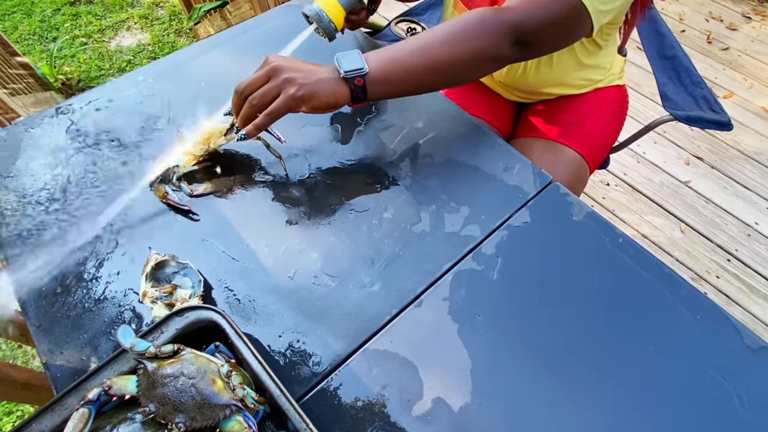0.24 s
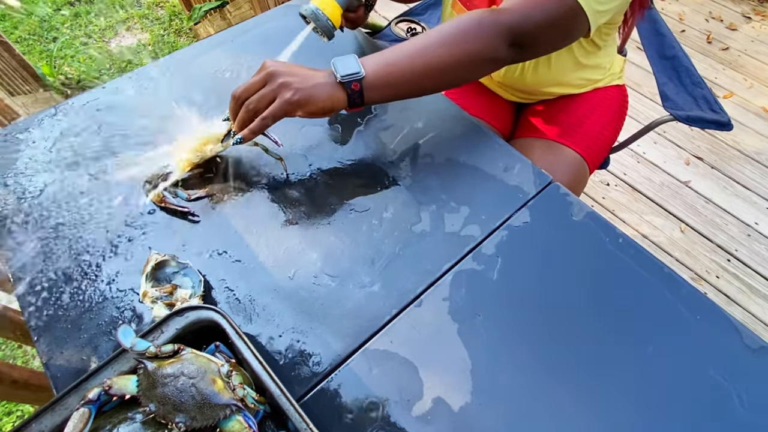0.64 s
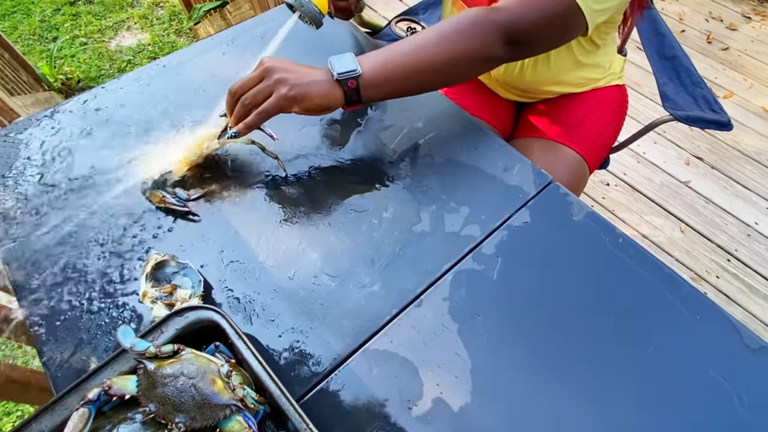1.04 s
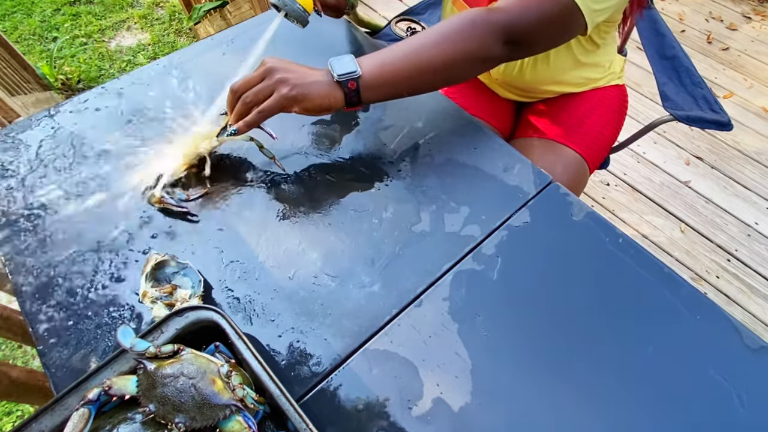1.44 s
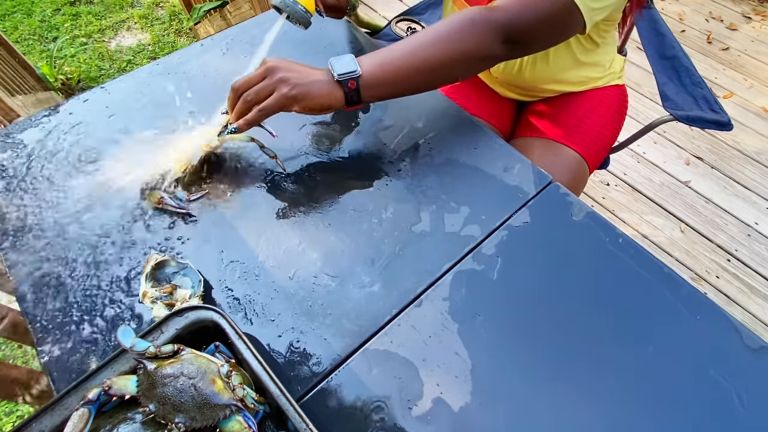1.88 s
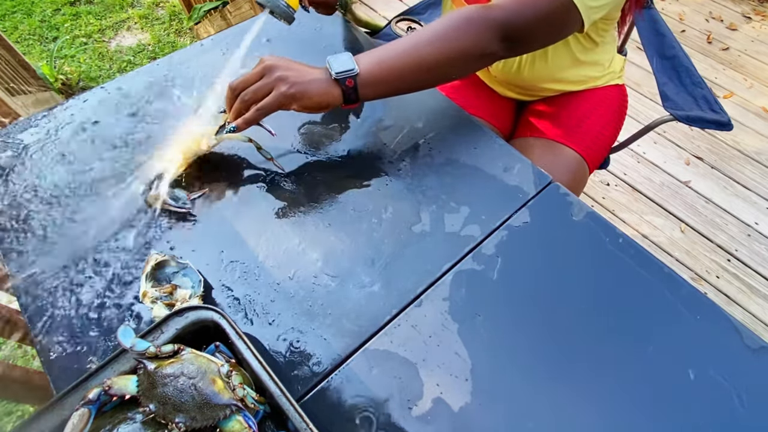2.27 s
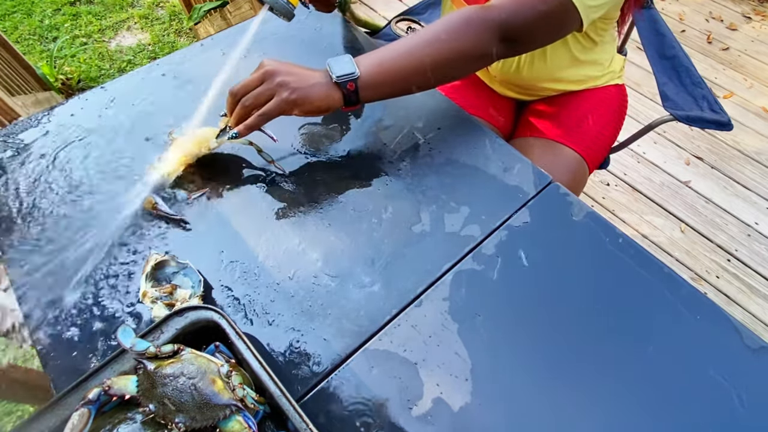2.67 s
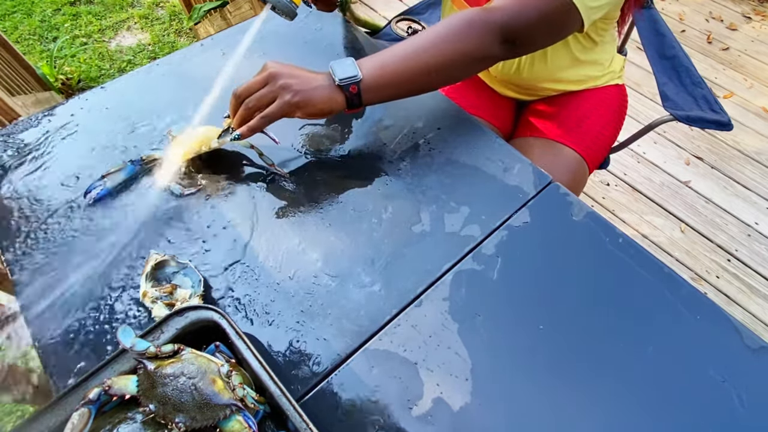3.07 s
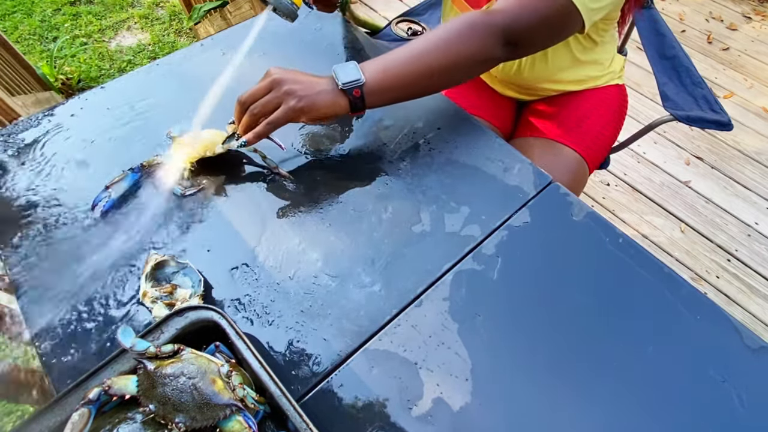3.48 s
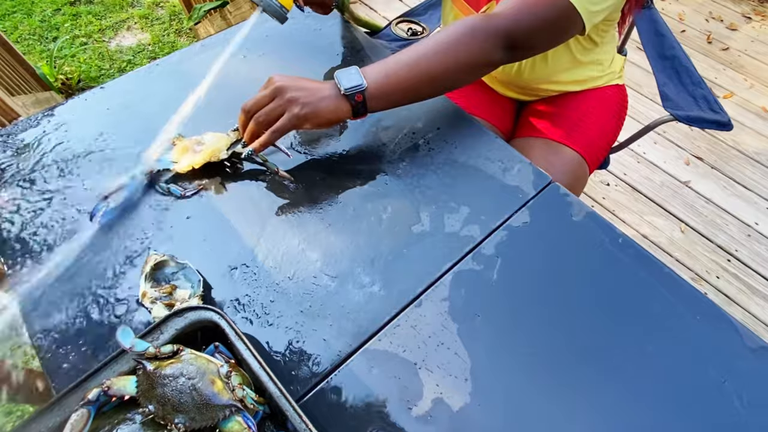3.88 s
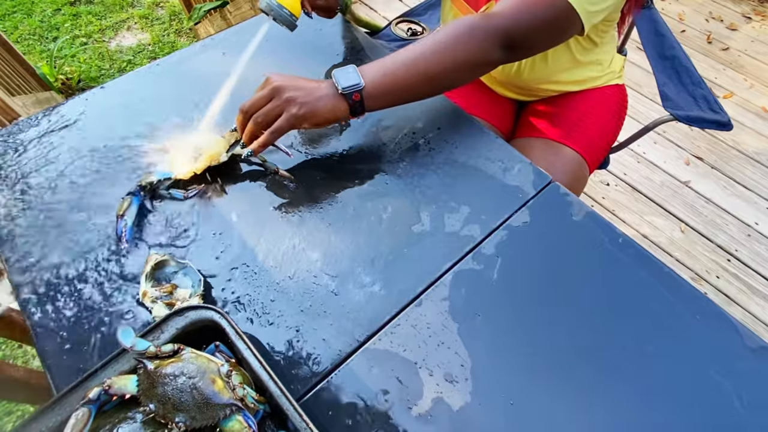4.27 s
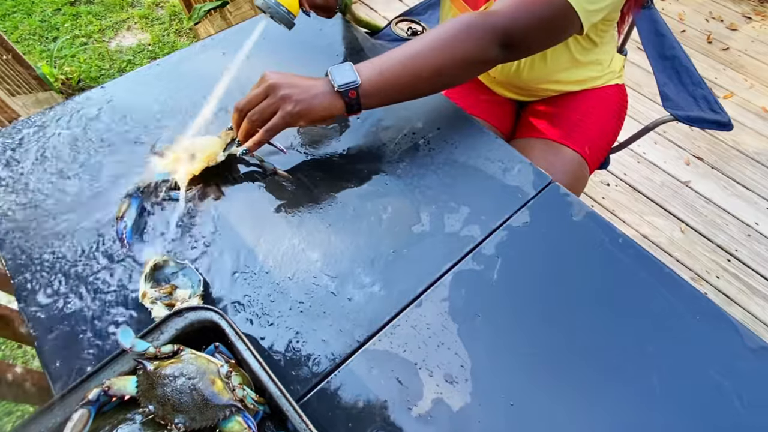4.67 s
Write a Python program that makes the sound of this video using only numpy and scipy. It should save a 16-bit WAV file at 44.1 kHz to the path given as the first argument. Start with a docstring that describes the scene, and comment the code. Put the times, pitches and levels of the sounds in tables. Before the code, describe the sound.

A steady, hissing water jet spatters over a crab shell and plastic table outdoors, with uneven low drumming that grows stronger past the middle.

```python
"""Hose jet on a shell over a plastic table

A hose jet sprays a shell held on a plastic table outdoors, near a pair of spaced microphone ports.
The jet breaks up into spatter, coloured noise under drop envelopes: splash from the left, fine fizz
from the right. Where the water strikes, noise-driven resonances drum as the table's low modes.
The pool gurgles in short rising tones; a low outdoor rumble of filtered noise lies below."""
import sys
import numpy as np
from scipy import signal
from scipy.fft import rfft, irfft, next_fast_len
from scipy.io import wavfile
from scipy.ndimage import uniform_filter1d

SR = 44100
rng = np.random.default_rng(int(sys.argv[2]) if len(sys.argv) > 2 else 0)


def store_wav(level_fs):
    """Save 16-bit WAV to argv[1]."""
    pcm = np.round(np.clip(np.atleast_2d(level_fs), -1, 1) * 32767)
    wavfile.write(sys.argv[1], SR, pcm.T.astype(np.int16))


def nominal_scale(level):
    """Amplitude ratio for a level in decibels (scalar or array-like)."""
    x = np.asarray(level, float) / 20
    return 10 ** x


N = 212906  # samples
PORTS_S = .000263  # sound travel time between the ports

# how hard the jet drums the table: start_s, then level_db of mode groups 1 (lowest) to 5 (upper)
DRUMMING = [(0.0, -48, -33, -58, -48, -41.5), (0.04, -43, -36.5, -56, -58, -52),
            (0.08, -41, -46, -38, -34, -47), (0.16, -34, -41, -40.5, -38.5, -48),
            (0.2, -44, -35.5, -39, -53, -44.5), (0.25, -36, -39.5, -38.5, -39, -46.5),
            (0.32, -54, -40, -55, -51.5, -52.5), (0.42, -52, -43, -46.5, -50, -48.5),
            (0.79, -53, -77, -60, -58.5, -63), (0.85, -48, -44, -48.5, -44, -44),
            (0.89, -39.5, -46, -52, -55, -51.5), (1.1, -70, -63, -48.5, -50.5, -66),
            (1.18, -45, -61, -61, -54, -52), (1.22, -54, -67, -65, -48, -47.5),
            (1.28, -63, -71, -48.5, -52.5, -63), (1.67, -40.5, -41.5, -46.5, -53.5, -51),
            (1.81, -86, -82, -71, -63, -85), (2.03, -53, -64, -53, -58, -68),
            (2.24, -49.5, -57, -56, -58, -59), (2.42, -33, -38, -41, -43, -40),
            (2.49, -41.5, -46.5, -42.5, -65, -50.5), (2.77, -33.5, -36.5, -48, -44, -45),
            (2.78, -31, -36, -48, -44, -48.5), (2.9, -34, -27, -35, -40, -39),
            (2.96, -36, -31, -40, -37, -35.5), (3.02, -32, -29, -45, -47, -38),
            (3.06, -47, -31, -36, -38, -38.5), (3.1, -43, -29.5, -46, -42, -44),
            (3.14, -40, -23, -37, -42, -35.5), (3.17, -20.5, -36, -50, -38, -34.5),
            (3.2, -33, -33.5, -39, -39, -40), (3.51, -41, -35, -44.5, -39, -39.5),
            (3.55, -36, -27.5, -48, -32.5, -43), (3.57, -26.5, -34, -35, -38, -36),
            (3.68, -40, -36, -44, -50, -48.5), (3.75, -34.5, -44, -39, -41, -44),
            (3.88, -32, -24, -38, -41, -40.5), (3.91, -37, -49, -39, -44, -43),
            (4.0, -44, -42, -52, -45, -42.5), (4.07, -55, -33, -41, -44.5, -43),
            (4.22, -35.5, -47, -38.5, -43, -46.5), (4.48, -43, -69, -45.5, -54, -52),
            (4.56, -36.5, -42, -41.5, -44, -48), (4.65, -41, -60, -53, -48, -53),
            (4.69, -44.5, -53, -37, -43.5, -47.5), (4.83, -42, -58, -57, -49, -51)]


def evened(x):
    """Scales to rms 1."""
    return x / np.sqrt(np.mean(x ** 2) + 1e-20)


def read(points, hz):
    """Interpolates a spectrum table on a log frequency axis."""
    point_hz, value = np.transpose(points)
    return np.interp(np.log(hz + 1), np.log(point_hz + 1), value)


def curve(rows, column):
    """One control curve at every sample."""
    rows = np.array(rows)
    return np.interp(np.arange(N) / SR, rows[:, 0], rows[:, column])


def wander(hz):
    """Slow random curve of rms 1: noise above 3 Hz, low-passed at hz."""
    size = next_fast_len(N)
    f = np.fft.rfftfreq(size, 1 / SR)
    spectrum = rfft(rng.standard_normal(size)) * (f > 3) / (1 + (f / hz) ** 2)
    return evened(irfft(spectrum, size)[:N])


def in_band(colour, lo_hz, hi_hz):
    """Level in dB that white noise of this colour has between two frequencies."""
    hz = np.linspace(0, SR / 2, num=512)
    inside = (hz > lo_hz) * (hz < hi_hz)
    return 10 * np.log10(np.mean(nominal_scale(2 * read(colour, hz)) * inside))


def bump(hz, centre_hz, octaves):
    """A flat-topped window on the frequency axis."""
    return np.exp(-(np.log2((hz + 1) / centre_hz) / octaves) ** 4)


def partly_alike(a, b, same):
    """Two signals for the ports, the second correlated with the first by the likeness same."""
    return np.array([a, same * a + np.sqrt(1 - same ** 2) * b])


def spatter(per_s, spread_db, decay_s):
    """Power of random drops, mean 1: sudden starts, short decays, a few large."""
    lands = rng.random(N) < per_s / SR
    size = nominal_scale(spread_db * np.minimum(rng.exponential(1, N), 4.2)) * lands
    power = signal.lfilter([1], [1, -np.exp(-1 / (decay_s * SR))], size ** 2)
    return power / power.mean()


def bursts():
    """Power of the largest bursts of spatter, under a millisecond each, in splash and in fizz."""
    # largest bursts: peak_s, peak_db over the spray, low_share (1 all splash, 0 all fizz)
    burst_rows = [(.0844, 14, .9), (.1012, 14, .6), (.7818, 13, .9), (.8277, 12, .1), (1.9806, 12, 0),
                  (2.0634, 13, 0), (2.6196, 12, .9), (2.6461, 13, .95), (3.1879, 13, 0), (4.4415, 13, .95),
                  (1.7252, 13, 0), (1.7703, 13, 0), (2.4268, 13, .1), (2.5814, 14, 0), (2.8202, 12, 0),
                  (2.8991, 14, .45), (3.0522, 15, .9), (3.2629, 16, .9), (3.3204, 14, .6),
                  (3.4215, 15.5, .9), (3.4705, 12, .2), (3.5674, 14, 0), (3.5798, 15, .9), (3.6415, 12, .6),
                  (3.741, 13, .7), (3.972, 14, .9), (3.8373, 18.5, .15), (3.9857, 14, .9), (4.0051, 14, .9),
                  (4.0424, 18, .05), (4.4163, 15, .1)]
    sigma_s = .0003
    t = np.arange(N) / SR
    total = np.zeros((2, N))
    for peak_s, peak_db, low_share in burst_rows:
        pulse = nominal_scale(2 * peak_db) * np.exp(-.5 * ((t - peak_s) / sigma_s) ** 2)
        total += np.outer([low_share, 1 - low_share], pulse)
    return total


def heard(power, colour, shifts, pan, same, lag_s, patchy_db, tint_db, leads=(), width=np.ones(N)):
    """Noise under a power envelope reaches both ports: partly alike, the right one lag_s later."""
    # extra phase between the ports by frequency: freq_hz, extra_lead_rad of the left
    extra_phase = [(200, 0), (650, 1.1), (1300, .5), (1450, .82), (1600, -.1), (1750, .25), (1900, 0),
                   (2200, -.4), (2400, -.2), (2700, .4), (3500, 0), (5000, -.9), (6500, 1), (6900, 0),
                   (7400, -3.2), (8000, -1.6), (8500, 0), (9000, -.5), (9400, -.4), (10000, -.9),
                   (11000, -.6), (12000, 0)]
    noise = np.sqrt(power) * rng.standard_normal((2, N))
    hz, t, z = signal.stft(noise, SR, nperseg=512, noverlap=448)
    at = np.minimum(t * SR, N - 1).astype(int)

    patch, tint = rng.standard_normal((2,) + z.shape[1:])
    patch = uniform_filter1d(uniform_filter1d(patch, size=9, axis=0), size=50, axis=1)  # drifting colour
    tint = uniform_filter1d(uniform_filter1d(tint, size=24, axis=0), size=4, axis=1)  # brief, broad tints
    moved_db = sum(np.outer(bump(hz, f, octaves), db[at]) for f, octaves, db in shifts)
    level_db = read(colour, hz)[:, None] + moved_db + patchy_db * evened(patch) + tint_db * evened(tint)

    likeness = np.clip(read(same, hz), 0, 1)[:, None] ** np.maximum(width[at], 0)
    aim_rad = sum(np.outer(bump(hz, f, octaves), lead[at]) for f, octaves, lead in leads)
    lead_rad = 2 * np.pi * np.outer(hz, lag_s[at]) + read(extra_phase, hz)[:, None] + aim_rad
    half_pan = nominal_scale(read(pan, hz) / 2)[:, None]
    left, right = partly_alike(z[0], z[1], likeness)
    z = np.array([left * half_pan, right * np.exp(-1j * lead_rad) / half_pan]) * nominal_scale(level_db)
    return signal.istft(z, SR, nperseg=512, noverlap=448)[1][:, :N]


def spray():
    """Splash and fizz share the drops and the flutter of the unsteady jet."""
    # jet strength: start_s, splash_db (2.5-6 kHz), fizz_db (9-12.5 kHz),
    # lower_db (lower half of the splash against its whole), spray_db (6-8.8 kHz)
    jet = [(0.0, -37, -41, -8.5, -38.5), (0.09, -46.5, -40.5, -8.5, -35.5), (0.13, -33.5, -32.5, -8.5, -35),
           (0.19, -44, -39.5, -5, -43.5), (0.28, -38.5, -34.5, -6, -38), (0.38, -40.5, -37.5, -4, -41.5),
           (0.58, -36.5, -34.5, -6.5, -37.5), (0.86, -42, -37, -3, -41.5), (1.1, -41.5, -37.5, -6, -42.5),
           (1.48, -38, -35, -4, -38), (1.61, -41, -38.5, -4, -42), (1.88, -40, -35.5, -5.5, -40),
           (2.19, -38.5, -35, -3, -38), (2.36, -41, -37.5, -4.5, -42), (2.47, -38, -34.5, -4.5, -40.5),
           (2.53, -40, -37.5, -4, -41), (2.65, -35, -35, -8, -40), (2.69, -40.5, -37, -7, -42.5),
           (2.88, -38, -32.5, -6, -40), (2.9, -34, -37, -7, -30.5), (2.92, -38.5, -35.5, -5, -37),
           (3.13, -41.5, -37, -7, -41), (3.27, -41.5, -34, -7.5, -36), (3.28, -41, -37, -10, -42.5),
           (3.4, -38, -36, -6, -37.5), (3.43, -33, -33.5, -8.5, -38), (3.44, -43, -37, -4.5, -40),
           (3.52, -40, -35, -4, -39.5), (3.57, -37, -35, -5, -33.5), (3.67, -37.5, -34.5, -6, -39),
           (3.7, -45, -40, 1, -42), (3.72, -36.5, -33, -8, -34), (3.82, -41, -37.5, -3.5, -40),
           (3.87, -36, -33.5, -4.5, -34.5), (3.95, -45.5, -35, 0, -40.5), (4.0, -35, -37, -9, -39),
           (4.03, -43, -39.5, -5, -46), (4.05, -40.5, -33.5, -6, -42), (4.06, -40, -37, -4, -39),
           (4.49, -36, -37, -8, -39), (4.5, -42, -38, -2, -38), (4.64, -35, -36.5, -9, -39.5),
           (4.66, -43, -39, -4.5, -39), (4.72, -34, -34, -8.5, -37), (4.81, -39.5, -36.5, -4.5, -39),
           (4.83, -40, -28, -4, -34)]
    # colour of each sound: freq_hz, density_db per Hz (relative)
    splash_colour = [(300, -8), (700, -8), (1200, -13), (1450, -6.5), (1600, -5), (1750, -7), (1900, -6.5),
                     (2200, -6.5), (2500, -8), (3200, -4), (4200, -2.5), (5300, 0), (7000, -4), (9000, -14),
                     (13000, -35)]
    fizz_colour = [(2000, -30), (5000, -14), (6500, -7), (7600, -2), (8600, -1), (9500, 0), (9950, -.5),
                   (10450, 1.5), (11500, 0), (13500, -1.3), (15500, -1.5)]
    # balance of the ports: freq_hz, left_minus_right_db
    splash_pan = [(400, 0), (900, 4), (1350, 0), (2300, 0), (3000, 3), (5000, 2.5), (7000, 0)]
    fizz_pan = [(5000, -3), (7700, -5), (8600, -1), (9500, -1), (10500, -2), (11500, 0)]
    # correlation between the ports: freq_hz, likeness (0-1)
    splash_same = [(300, .3), (700, .65), (1200, .55), (1330, .65), (1420, .98), (1500, .97), (1600, .5),
                   (1750, .93), (1900, .89), (2050, .84), (2200, .82), (2400, .65), (3000, .45), (3800, .8),
                   (4400, .7), (4700, .85), (5300, .6), (5950, .8), (7000, .55)]
    fizz_same = [(6000, .5), (8300, .6), (8800, .7), (9200, .92), (9500, .85), (9900, .72), (10400, .9),
                 (11300, .93), (12300, .88), (12900, .99), (13700, .99), (14300, .86), (15300, .97)]
    # splash as the ports meet it: start_s, extra_lead_rad of the left near 2.9 kHz,
    # extra_lead_rad near 4.7 kHz, width (1 usual, more is less alike)
    splash_aim = [(0, .3, 2.5, 1), (.09, .3, 2.4, 1.2), (.16, .2, .2, 1.2), (.35, .1, .2, 1.5),
                  (.8, .1, .2, 1.1), (1.2, 0, .2, .8), (1.8, .1, .1, .7), (1.95, .2, .5, 1.5),
                  (2.55, .6, .6, 1.4), (2.68, .4, 1, .35), (2.93, .5, 2.2, .4), (3.02, .6, 2.3, 1.3),
                  (3.17, .5, 2.4, .45), (3.34, .6, 2.3, .5), (3.4, .8, 2.2, 1.4), (3.5, .8, 2.1, 1.6),
                  (3.8, .7, 1.2, 2), (4.05, .7, .6, 1.6), (4.25, .6, .3, .5), (4.5, .5, .3, .6),
                  (4.83, .4, .3, .9)]

    flutter_db, flutter_hz, surge_db, surge_hz = 0.4, 43, 0.5, 18
    ragged_db_per_db, ragged_from_db = 0.32, -54  # drop power follows the upper modes' drumming
    usual_splash_db, usual_fizz_db, usual_lower_db = -37.5, -34, -5.5
    usual_splash_gap_db, usual_fizz_gap_db = -2, -2  # 6-8.8 kHz against either level
    # share of the swing that the bottom of the splash and the top of the fizz do not follow
    splash_dulling, fizz_dulling = 1, 0.2
    # splash position along the line of the ports (1 = end on), wandering at random
    side, sway, sway_hz = .96, .05, 32.0
    width_flicker_db, width_flicker_hz = 3, 36

    flutter = nominal_scale(2 * flutter_db * wander(flutter_hz))
    surges = nominal_scale(2 * surge_db * wander(surge_hz))
    low_bursts, high_bursts = bursts()
    ragged = nominal_scale(2 * ragged_db_per_db * np.maximum(curve(DRUMMING, column=5) - ragged_from_db, 0))
    drops = ragged * spatter(650, 3.2, 0.00045)

    splash_drops = 0.85 + 0.38 * drops + 0.32 * spatter(330, 1.9, 0.0017)
    splash_power = flutter * surges * splash_drops / (0.95 + 0.25 * ragged) + low_bursts
    fizz_drops = 0.88 + 0.5 * drops + 0.31 * spatter(600, 3.0, 0.00037)
    fizz_power = flutter * fizz_drops / (0.71 + 0.31 * ragged) + high_bursts

    splash_db, fizz_db, lower_db, spray_db = (curve(jet, column=k) for k in range(1, 5))
    # centre Hz, half width octaves, dB
    splash_shifts = [(1330, 0.6, splash_dulling * (usual_splash_db - splash_db)),
                     (3160, 0.35, 1.34 * (lower_db - usual_lower_db)),
                     (7000, 0.44, spray_db - splash_db - usual_splash_gap_db)]
    fizz_shifts = [(15100, 0.2, fizz_dulling * (usual_fizz_db - fizz_db)),
                   (6960, 0.26, spray_db - fizz_db - usual_fizz_gap_db)]

    splash_lag_s = PORTS_S * (side + sway * wander(sway_hz))
    leads = [(2800, .6, curve(splash_aim, column=1)), (4700, .12, curve(splash_aim, column=2))]
    width = curve(splash_aim, column=3) * nominal_scale(width_flicker_db * wander(width_flicker_hz))
    splash = heard(splash_power, splash_colour, splash_shifts, splash_pan, splash_same, splash_lag_s,
                   patchy_db=1.54, tint_db=1.16, leads=leads, width=width)
    fizz = heard(fizz_power, fizz_colour, fizz_shifts, fizz_pan, fizz_same, np.full(N, -PORTS_S),
                 patchy_db=0.77, tint_db=1.5)
    splash_gain = nominal_scale(splash_db - in_band(splash_colour, 2500, 6000))
    fizz_gain = nominal_scale(fizz_db - in_band(fizz_colour, 9000, 12500))
    return splash_gain * splash + fizz_gain * fizz


def table():
    """All modes share the same lumps of water; each group surges separately, each mode has its own noise."""
    # table-top modes: freq_hz, width_hz of each of two poles, level_db, left_minus_right_db,
    # left_lead_rad, group (1-5)
    modes = [(160, 35, 0, -5, .1, 1), (205, 35, 0, -1, -.2, 2), (248, 28, -3, 2, -2.8, 2),
             (310, 45, -1, -5, .5, 3), (412, 55, 0, 1, .3, 4), (350, 45, -2, 1, 2.9, 3),
             (390, 45, -1, 1, 2.8, 4), (520, 60, -3, 2, 1.2, 5), (595, 70, 2, 1, 2.1, 5),
             (690, 110, -2, 2, 2.2, 5), (960, 120, -5, 6, 2.3, 5), (1600, 90, -16, 0, 2.4, 5),
             (2250, 250, -13, 0, -2.3, 5), (800, 190, -1.5, 5, 2.3, 5), (1150, 170, -4, 3, 3.0, 5),
             (1330, 100, -14, 4, 2.0, 5)]
    # high modes reach the ports from different parts of the top: freq_hz, likeness (0-1)
    table_same = [(300, 0.87), (500, 0.89), (1300, 0.76), (1800, 0.65)]
    surge_db, surge_hz = .8, 33  # the striking spot jumps about, each group surging on its own

    lumps = np.sqrt(0.32 + 0.17 * spatter(120, 2.8, 0.00059))
    force = [lumps * nominal_scale(curve(DRUMMING, column=group) + surge_db * wander(surge_hz))
             for group in range(1, 6)]
    t, out = np.arange(N) / SR, np.zeros((2, N))
    for hz, width_hz, db, pan_db, lead_rad, group in modes:
        a, b = rng.standard_normal((2, N, 2)) @ [1, 1j]
        drive = force[round(group) - 1] * partly_alike(a, b, min(read(table_same, hz), 1))
        r = np.exp(-np.pi * width_hz / SR)
        envelope = signal.lfilter([2 * (1 - r) ** 1.5], [1, -2 * r, r * r], drive)
        ring = envelope * np.exp(2j * np.pi * hz * t)
        ports = nominal_scale(np.array([pan_db, -pan_db]) / 2) * np.exp([.5j * lead_rad, -.5j * lead_rad])
        out += nominal_scale(db) * (ports[:, None] * ring).real
    return out


def gurgle():
    """Air pockets in the pooled water pop with short rising tones, louder and earlier on the left."""
    level_db, per_s, lo_hz, hi_hz = -59, 90, 540, 1230
    cycles, rise = 6, .25  # cycles in which the decay term falls by e^4, pitch rise (share) by then

    out, lag = np.zeros((2, N + SR)), round(PORTS_S * SR)
    for when, pitch, size, pan in rng.random((int(per_s * N / SR), 4)):
        hz = lo_hz * (hi_hz / lo_hz) ** pitch
        turns = np.arange(0, 2 * cycles, hz / SR)
        u = 2 * turns / cycles
        tone = np.sin(2 * np.pi * turns * (1 + rise * u / 4))
        pop = u * np.exp(-2 * u) * tone * nominal_scale(-3 * np.log(size + 0.0088))  # a few large
        at = int(when * N)
        out[0, at:at + len(pop)] += pop * nominal_scale(7.4 * (pan + 0.3))
        out[1, at + lag:at + lag + len(pop)] += pop
    return nominal_scale(level_db) * evened(out[:, :N])


def rumble(pan_db=1.0):
    """Low outdoor noise, nearly the same at both ports only in the bass."""
    # rumble spectrum: freq_hz, density_db (relative)
    rumble_colour = [(20, -36), (40, -7.5), (55, 1), (90, 0.5), (150, -4), (300, -8), (600, -20),
                     (1400, -31.5), (1600, -21), (1800, -38)]
    # rumble level: start_s, level_db
    rumble_level = [(0, -43.5), (.8, -44.5), (1.05, -44.5), (1.3, -43), (1.7, -44.5), (2.1, -43.5),
                    (2.7, -43), (3.1, -41), (4.2, -41), (4.83, -41.5)]
    # correlation between the ports: freq_hz, likeness (negative = opposed)
    rumble_same = [(60, .88), (170, .8), (250, -.35), (330, .2), (600, 0)]

    hz = np.fft.rfftfreq(N, 1 / SR)
    a, b = rfft(rng.standard_normal((2, N)))
    low = irfft(partly_alike(a, b, read(rumble_same, hz)) * nominal_scale(read(rumble_colour, hz)), N)
    pan = np.array([[pan_db], [-pan_db]]) / 2
    return nominal_scale(curve(rumble_level, column=1) + pan) * evened(low)


def scene():
    """Spray, drumming table, gurgle and rumble."""
    return spray() + table() + gurgle() + rumble()


def low_pass(x):
    """Removes everything above the highest recorded frequency."""
    return signal.sosfilt(signal.butter(12, 17090, fs=SR, output="sos"), x)


def record(dry):
    """Low cut at 42 Hz, then a steep band limit at 15.76 kHz."""
    low_cut = signal.butter(2, 42, "high", fs=SR, output="sos")
    edge = signal.firwin(1023, 15760, window=("kaiser", 9), fs=SR)
    mix = signal.oaconvolve(signal.sosfilt(low_cut, dry), edge[None], "same", axes=1)
    return low_pass(mix)


dry = scene()
out = record(dry)
store_wav(out)
```